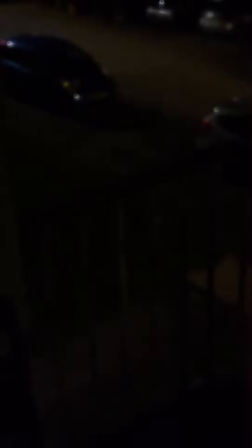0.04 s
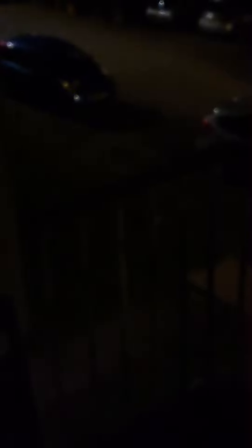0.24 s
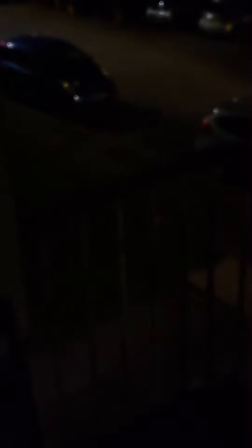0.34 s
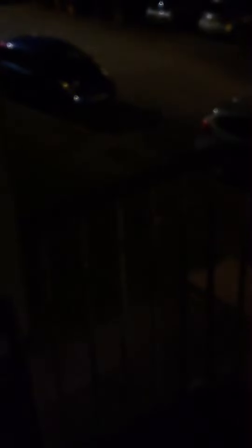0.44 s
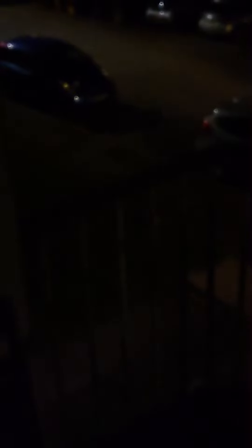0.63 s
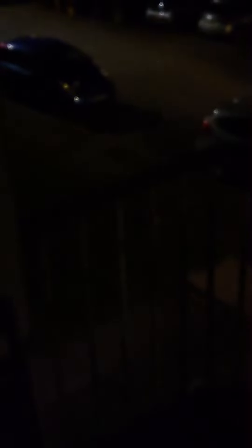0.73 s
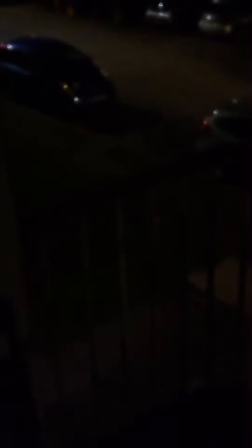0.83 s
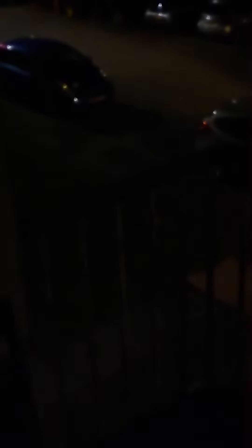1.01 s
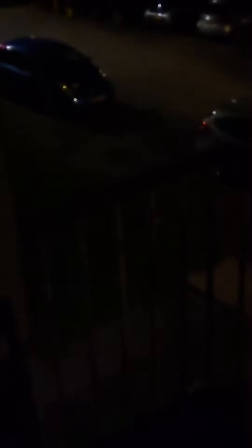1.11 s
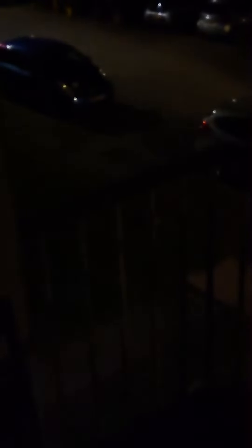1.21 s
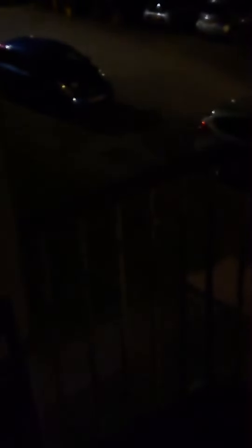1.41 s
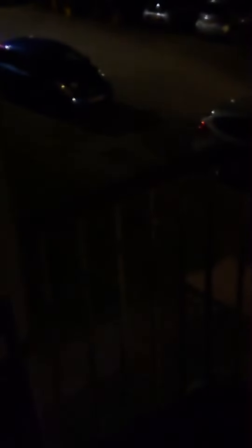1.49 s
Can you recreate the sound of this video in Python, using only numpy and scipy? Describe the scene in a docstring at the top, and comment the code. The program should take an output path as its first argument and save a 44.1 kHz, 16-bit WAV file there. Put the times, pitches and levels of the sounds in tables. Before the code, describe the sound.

Heard from a balcony at night, a single raspy fox scream rings along a quiet street and dies away. Distant traffic rumbles low, and a hand softly bumps the microphone before a faint cloth rustle.

```python
"""A street at night, heard from a balcony: a fox screams once over the quiet rumble of distant traffic.
Its voice slides up into a harsh rasp as the vocal folds slap unevenly, then clears into a sinking tone.
A second, slower vibration of the throat adds extra tones around it, and the house fronts echo it all.
The hand that holds the phone makes a few light ticks and soft bumps, and a sleeve rustles faintly."""
import sys
import numpy as np
from scipy import signal
from scipy.fft import rfft, irfft, next_fast_len
from scipy.io import wavfile
from scipy.ndimage import uniform_filter1d, map_coordinates

SR = 44100
rng = np.random.default_rng(int(sys.argv[2]) if len(sys.argv) > 2 else 0)


def to_wav(sig):
    """Store sig (one row per channel, or 1-D mono) as 16-bit WAV at the path in sys.argv[1].

    Samples outside -1..1 are clipped; the rate is SR.
    """
    pcm = np.clip(np.atleast_2d(sig), -1, 1) * 32767
    pcm = np.round(pcm).astype(np.int16)
    wavfile.write(sys.argv[1], SR, pcm.T)  # frames by channels


N = 68355


def undb(db):
    """Turn decibels into a factor to multiply by."""
    return 10 ** (np.asarray(db) / 20)


def unit(x):
    """Scale a signal to an average strength (rms) of 1."""
    return x / np.sqrt(np.mean(x ** 2))


def curve(table, column=1):
    """One column of a table, joined by straight lines in time."""
    rows = np.array(table)
    return np.interp(np.arange(N) / SR, rows[:, 0], rows[:, column])


def envelope(table):
    """Loudness over time from rows of time_s, level_db, easing into silence outside them."""
    t = np.arange(N) / SR
    sounding = 1. * (t > table[0][0]) * (t < table[-1][0])
    return undb(curve(table)) * uniform_filter1d(sounding, size=600)


def db_at(hz, points):
    """Read decibels at any frequency from rows of frequency_hz, gain_db."""
    rows = np.array(points)
    return np.interp(np.log(hz + 1), np.log(rows[:, 0]), rows[:, 1])


def colour(x, points):
    """Make some frequencies louder and others softer, by rows of frequency_hz, gain_db."""
    size = 2 * next_fast_len(N)
    hz = np.arange(size // 2 + 1) * SR / size
    cepstrum = irfft(np.log(undb(db_at(hz, points))))
    # Fold onto the first half, so the filter rings only after a sound, never before it.
    cepstrum[1:size // 2] *= 2
    cepstrum[size // 2 + 1:] = 0
    return irfft(rfft(x, size) * np.exp(rfft(cepstrum)))[..., :N]


def wander(rate_hz):
    """A smooth random drift with a typical size of 1."""
    steps = rng.standard_normal(N // 10)
    return unit(np.interp(np.arange(N) / SR * rate_hz, np.arange(len(steps)), steps))


def fade(start_s, fade_s):
    """Jump to 1 at start_s, then die away by 60 dB every fade_s."""
    age = np.arange(N) / SR - start_s
    return (age >= 0) * np.exp(-np.log(1000) * np.maximum(age, 0) / fade_s)


def pan(left_minus_right_db):
    """Factors for the left and right sides."""
    return undb(np.array([[left_minus_right_db], [-left_minus_right_db]]) / 2)


def shaky_phase(pitch_hz, shake):
    """The angle of a vibration whose pitch trembles by the share `shake`."""
    return 2 * np.pi * np.cumsum(pitch_hz * (1 + shake * wander(rate_hz=700))) / SR


def town():
    """Distant traffic: a slowly swelling rumble, alike on both sides in the bass, with a thin hiss."""
    # Colour of the traffic: frequency_hz, gain_db
    traffic_colour = [(22, -57.5), (32, -13), (42, -6.5), (55, 5), (80, -1), (130, -9.5), (220, -11.5),
                      (450, -22.5), (1000, -22.5), (1700, -28), (3000, -35), (6000, -45.5), (10500, -43),
                      (15000, -47)]
    level_db, drift_db, rise_db_per_s, wide_above_hz = -56, .7, 1, 113
    middle, side = colour(rng.standard_normal((2, N)), traffic_colour)
    side = signal.sosfilt(signal.butter(1, wide_above_hz, "high", fs=SR, output="sos"), side)
    swell_db = drift_db * wander(rate_hz=1.1) + rise_db_per_s * (np.arange(N) - N / 2) / SR
    return unit(np.array([middle + side, middle - side])) * undb(level_db + swell_db) * pan(-2)


def hand_ticks():
    """The hand makes light ticks on the phone, each a tiny burst of noise."""
    # The ticks, each played at half this strength: start_s, level_db
    ticks = [(0.05, -45.5), (.949, -53), (1.05, -46), (1.271, -55.5)]
    # Colour of a tick: frequency_hz, gain_db
    tick_colour = [(1200, -1), (1900, 5.5), (3500, -2.5), (6000, -14), (10000, -3.5), (15000, -32)]
    out = np.zeros((2, N))
    for start_s, level_db in ticks:
        noise = unit(colour(rng.standard_normal((2, N)), tick_colour))
        out += undb(level_db) / 2 * noise * fade(start_s, fade_s=.02)
    return out


def fox_tone():
    """The vocal folds slide up on a pure note, then buzz; a second vibration adds side tones and a moan."""
    # Pitch of the vocal folds: time_s, pitch_hz
    fold_pitch = [(.14, 440), (.17, 595.3), (.2, 640.7), (.225, 776.6), (.255, 865.2), (.33, 896),
                  (.42, 907.5), (.46, 928.7), (.487, 966), (.52, 945.5), (.555, 926.6), (.59, 926.8),
                  (.66, 911), (.73, 887), (.78, 857), (.815, 817)]
    # The throat's second vibration, briefly at two thirds of the folds' pitch:
    # time_s, pitch_hz, depth (0-1), overtone_share (0-1)
    throat = [(.22, 516, .2, .5), (.29, 508.5, .3, .5), (.32, 501.6, 0.6, .3), (.4, 497, 0.5, .3),
              (.43, 505, 0.4, .5), (.485, 562.2, .15, .5), (.507, 621.3, 1, .6), (.542, 623, 0.8, .55),
              (.555, 579.4, 0.4, .3), (.58, 562, 0.8, .25), (.605, 505.8, 0.4, .2), (.635, 474.3, .7, .2),
              (.655, 495.2, 0.6, .3), (.71, 483.2, 1, .25), (.77, 402, .7, .2), (.788, 301.9, 1, .1),
              (.815, 314, 1, .1)]
    # How much the two pitches tremble: time_s, fold_share, throat_share
    shake = [(.17, 0.0595, 0.065), (.26, .022, 0.059), (.45, .022, 0.08), (.505, 0.005, .005),
             (.54, 0.0033, .005), (.57, 0.016, 0.037), (.72, 0.021, 0.049), (.8, .018, 0.045)]
    # How throat and mouth colour the buzz: frequency_hz, gain_db
    buzz_colour = [(200, -70), (480, -29), (620, -34), (780, -15.5), (930, -2), (1130, -12), (1260, -8.5),
                   (1420, 11.5), (1600, -5.5), (1880, 4), (2250, 2.5), (2500, -4), (2800, -29.5),
                   (3150, -4), (3470, -11), (3750, -16.5), (4100, -18), (5500, -27), (7000, -35.5),
                   (10500, -33), (11800, -52.5), (15000, -56.5)]
    # Loudness of the buzz with its side tones: time_s, level_db
    buzz_level = [(.2, -56.5), (.228, -41), (.28, -39.5), (.35, -25.5), (.44, -34), (.49, -26), (.52, -25),
                  (.6, -27), (.715, -37.5), (.765, -55), (.81, -62.5), (.828, -64.5)]
    # Loudness of the pure note at the folds' pitch: time_s, level_db
    note_level = [(.13, -91.5), (.165, -56.5), (.195, -58.5), (.22, -44), (.275, -34.5), (.4, -32.5),
                  (.5, -52), (.72, -47), (.795, -58.5), (.82, -51.5)]
    # Loudness of the low moan at the second vibration's pitch: time_s, level_db
    moan_level = [(.21, -53), (.27, -73), (.36, -70), (.52, -53), (.6, -66)]
    # Loudness of the side tone at the two pitches added together: time_s, level_db
    sum_level = [(.28, -44.5), (.32, -26), (.395, -26.5), (.45, -52), (.776, -59), (.788, -43.5),
                 (.812, -51.5), (.826, -71)]
    fold_shake, throat_shake = curve(shake), curve(shake, column=2)
    depth, overtone_share = curve(throat, column=2), curve(throat, column=3)
    fold_phase = shaky_phase(curve(fold_pitch), fold_shake)
    throat_phase = shaky_phase(curve(throat), throat_shake)
    buzz = sum(np.cos(k * fold_phase) for k in range(1, 17))
    side_tones = sum(np.cos(k * fold_phase + throat_phase)
                     + overtone_share * np.cos(k * fold_phase + 2 * throat_phase) for k in range(16))
    voice = unit(colour(buzz + depth * side_tones, buzz_colour)) * envelope(buzz_level)
    note = unit(np.sin(fold_phase)) * envelope(note_level)
    moan = unit(np.sin(throat_phase)) * envelope(moan_level)
    sum_phase = shaky_phase(curve(fold_pitch) + curve(throat), fold_shake)
    sum_tone = unit(np.sin(sum_phase)) * envelope(sum_level)
    flutter_db = 31.5 * fold_shake * wander(rate_hz=230)  # a shakier pitch shakes the loudness too
    return (voice + note + moan + sum_tone) * undb(flutter_db)


def fox_rasp():
    """Uneven slaps of the vocal folds, each with a puff of air, ring the throat and the opening mouth."""
    # How throat and mouth colour the rasp: frequency_hz, gain_db
    rasp_colour = [(250, -44), (450, -54.5), (610, -19), (790, -47), (900, -10), (1080, 5), (1175, -2.5),
                   (1260, -13.5), (1400, 1), (1540, -8), (1680, 1.5), (2000, -1.5), (2150, -8.5),
                   (2650, -28.5), (2900, -19), (3070, -7.5), (3250, -15.5), (3500, -14.5), (4050, -25),
                   (4280, -13), (4520, -27.5), (4750, -11.5), (5050, -22), (5900, -21.5), (7000, -53),
                   (10700, -35), (12200, -53.5), (14500, -50)]
    # The ringing rises as the jaws part and sinks as they close: time_s, share_of_full_frequency
    jaws = [(.2, 0.9), (.25, 0.98), (.33, 1), (.45, 1), (.72, 0.97), (.8, 0.9)]
    # Loudness of the rasp: time_s, level_db
    rasp_level = [(.21, -60), (.232, -37), (.258, -23.5), (.32, -18), (.39, -18.5), (.465, -22),
                  (.495, -24.5), (.514, -50.5), (.545, -44.5), (.565, -37), (.72, -47.5), (.78, -47)]
    # One sharp ring that stands out while the mouth opens: frequency_hz, gain_db
    ring_colour = [(600, -40), (1200, -21.5), (1530, -16), (1670, 6.5), (1780, -5), (2050, -11),
                   (2600, -29.5), (12000, -53.5)]
    # Loudness of that ring: time_s, level_db
    ring_level = [(.198, -61), (.215, -31.5), (.24, -22.5), (.29, -25.5), (.36, -70)]
    slap_rate_hz, gap_spread, slap_spread_db = 310, .3, 1.5
    puff_s, air_db = .0033, -2
    gap_chance, strength_chance = rng.standard_normal((N // 40, 2)).T
    slap_at = (np.cumsum(np.exp(gap_spread * gap_chance)) * SR / slap_rate_hz).astype(int)
    inside = slap_at < N
    slaps = np.zeros(N)
    slaps[slap_at[inside]] = undb(-slap_spread_db * np.tanh(strength_chance[inside]))
    puff = fade(0, np.log(1000) * puff_s)  # falls to about a third in puff_s
    air = signal.fftconvolve(slaps, puff)[:N] * rng.standard_normal(N)
    source = unit(slaps) + undb(air_db) * unit(air)
    read_at = np.cumsum(curve(jaws))  # reading the sound more slowly lowers all its frequencies
    rasp = map_coordinates(colour(source, rasp_colour), [read_at], order=5, mode="mirror")
    ring = unit(colour(source, ring_colour))
    return unit(rasp) * envelope(rasp_level) + ring * envelope(ring_level)


def street_echoes(voice):
    """Nearby walls scatter the voice briefly; house fronts give a long echo whose treble dies first."""
    # Colour of the long echo: frequency_hz, gain_db
    echo_colour = [(500, -2.5), (950, 0), (1500, -6.5), (2500, -10), (5000, 5.5), (12000, 19.5)]
    longest_fade_s, damping_per_khz, build_s = 1.984, .3, .0069
    near_gain_db, far_gain_db = -6, -17.5
    band_edges_hz = [100, 700, 1400, 2800, 5600, 16000]
    t, tail = np.arange(N) / SR, 0
    for low, high in zip(band_edges_hz, band_edges_hz[1:]):
        band_filter = signal.butter(2, [low, high], "band", fs=SR, output="sos")
        band = signal.sosfilt(band_filter, rng.standard_normal((2, N)))
        centre_khz = np.sqrt(low * high) / 1000
        tail = tail + band * fade(0, longest_fade_s / (1 + damping_per_khz * centre_khz))
    build_up = 1 - np.exp(-t / build_s)
    far = undb(far_gain_db) * colour(unit(tail * build_up), echo_colour)
    near = undb(near_gain_db) * unit(rng.standard_normal((2, N)) * fade(0, fade_s=.17))
    return [signal.fftconvolve(voice[None], walls / np.sqrt(N), axes=1)[:, :N] for walls in (near, far)]


def fox():
    """The scream reaches the two microphone openings with different colour and delay, then echoes."""
    # How far the right opening lags behind the left: frequency_hz, lag_radians
    right_lag = [(620, 1), (950, 0.9), (1290, 6.5), (1480, 4), (1810, 8.5), (3010, 13), (4650, 35.5),
                 (5510, 37.5), (7000, 28.5), (15000, 33)]
    # Which side hears the scream louder: frequency_hz, left_minus_right_db
    balance = [(620, -2.5), (800, -4.5), (1100, -12.5), (1250, -12.5), (1400, -15.5), (1600, -1.5),
               (1900, -9), (2700, 4), (3300, -1), (3900, -11), (5500, -5), (6300, -8.5), (10500, 14.5),
               (14000, 2)]
    voice = fox_tone() + fox_rasp()
    near, far = street_echoes(voice)
    hz = np.arange(N + 1) * SR / (2 * N)
    lag_radians = np.interp(hz, *np.array(right_lag).T)
    right = irfft(rfft(voice, 2 * N) * np.exp(-1j * lag_radians))[:N]
    both_sides = np.array([voice, right]) + near
    balance_db = db_at(hz, balance)
    side_gains = undb(np.array([balance_db, -balance_db]) / 2)
    return irfft(rfft(both_sides, 2 * N) * side_gains)[:, :N] + far


def hand_bumps():
    """Dull knocks of the hand make the phone's body ring briefly."""
    # The bumps: start_s, level_db, pitch_hz, left_minus_right_db
    bumps = [(0.743, -41, 88, -24), (0.874, -43, 85.4, -26), (0.898, -47, 123, -22),
             (.949, -37.5, 89.3, -20), (1.061, -44, 95.6, -23), (1.271, -52.5, 142.3, -25)]
    knock_top_hz, knock_gain_db = 550, 1.5
    dull = signal.butter(3, knock_top_hz, fs=SR, output="sos")
    t, out = np.arange(N) / SR, np.zeros((2, N))
    for start_s, level_db, pitch_hz, left_minus_right_db in bumps:
        push = np.cos(np.pi * knock_top_hz * (t - start_s)) * fade(start_s, fade_s=.0048)
        knock = signal.sosfilt(dull, push) * undb(knock_gain_db)
        ring = np.sin(2 * np.pi * pitch_hz * (t - start_s)) * fade(start_s, fade_s=.04)
        out += pan(left_minus_right_db) * undb(level_db) * (ring - knock)
    return out


def sleeve():
    """Cloth brushes faintly near the phone, making a soft, fluttering noise."""
    # Colour of the rustle: frequency_hz, gain_db
    rustle_colour = [(150, -3), (300, 1.5), (1000, 4.5), (2000, -6), (14000, -30.5)]
    # Loudness of the rustle: time_s, level_db
    rustle_level = [(1.24, -75), (1.39, -59.5), (1.46, -66), (1.55, -64)]
    noise = unit(colour(rng.standard_normal((2, N)), rustle_colour))
    flutter_db = 1.94 * wander(rate_hz=190)
    return noise * envelope(rustle_level) * undb(flutter_db)


def scene():
    """Fox, hand, town and sleeve together."""
    return fox() + hand_bumps() + hand_ticks() + town() + sleeve()


def record(dry):
    """The phone drops a band of the treble, thins the deep bass and cuts the very top."""
    # The phone's dead band in the treble: frequency_hz, gain_db
    dead_band = [(6200, -2), (6800, -6), (7200, -28), (9000, -27.5), (9700, -7), (10200, -1), (14500, 3),
                 (15700, -17.5)]
    low_cut_hz, top_hz = 18, 15600
    bass_cut = signal.butter(3, low_cut_hz, "high", fs=SR, output="sos")
    top_cut = signal.ellip(10, .2, 80, top_hz, fs=SR, output="sos")
    thinned = signal.sosfilt(bass_cut, colour(dry, dead_band))
    return signal.sosfilt(top_cut, thinned)


dry = scene()
out = record(dry)
to_wav(out)
```